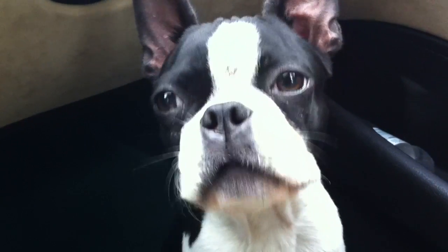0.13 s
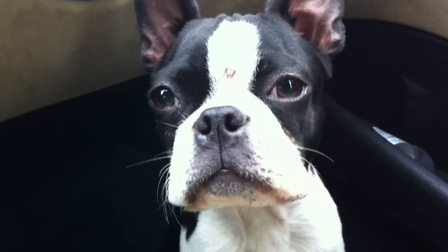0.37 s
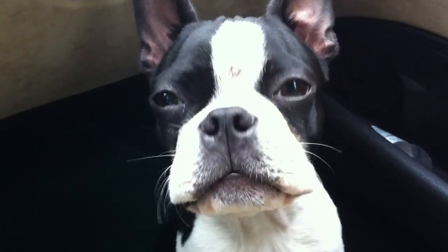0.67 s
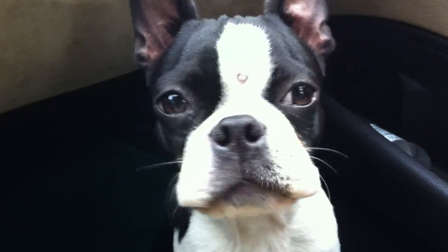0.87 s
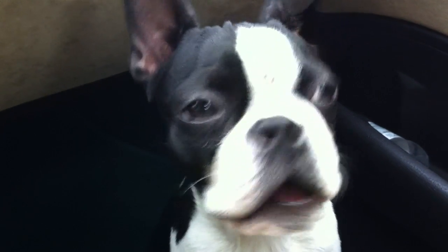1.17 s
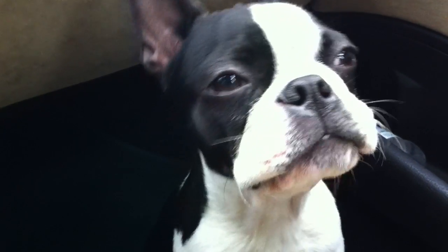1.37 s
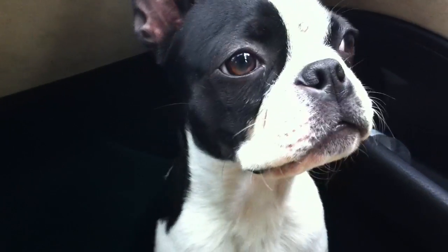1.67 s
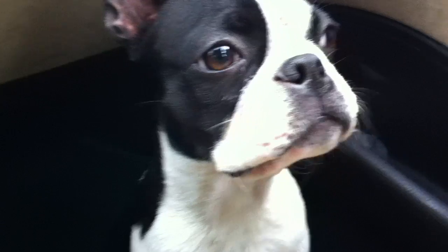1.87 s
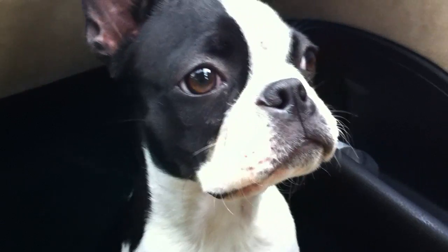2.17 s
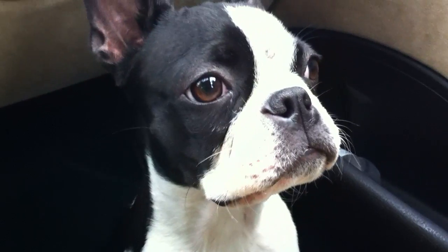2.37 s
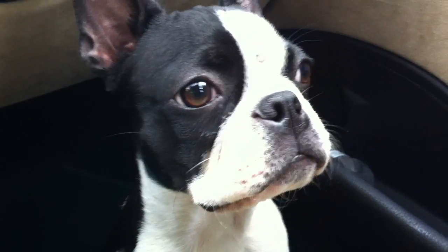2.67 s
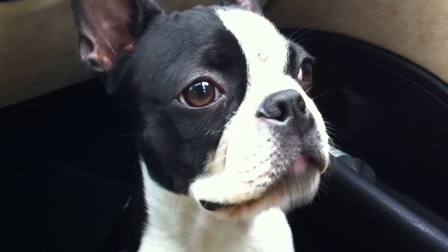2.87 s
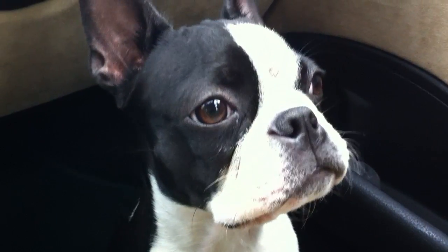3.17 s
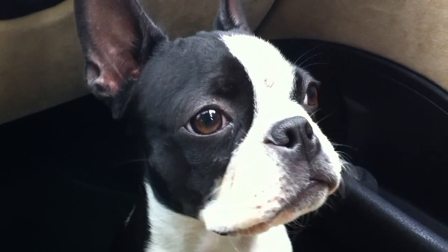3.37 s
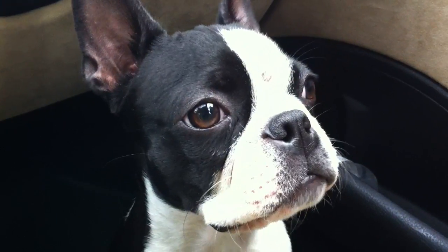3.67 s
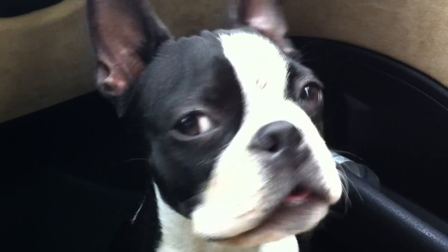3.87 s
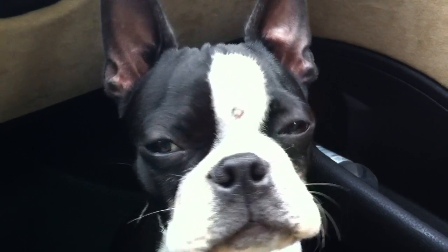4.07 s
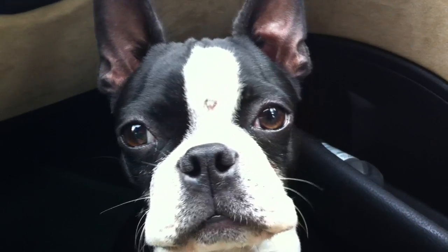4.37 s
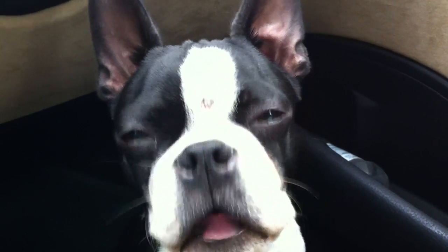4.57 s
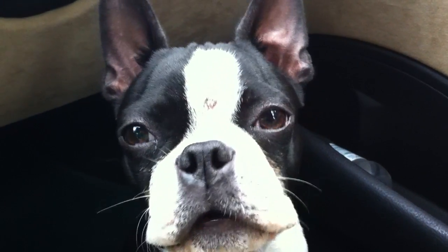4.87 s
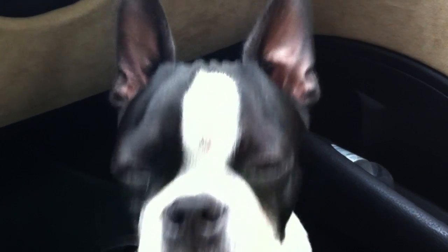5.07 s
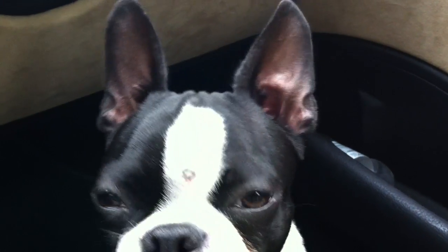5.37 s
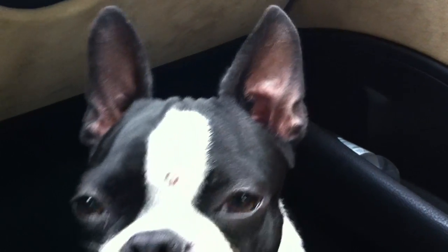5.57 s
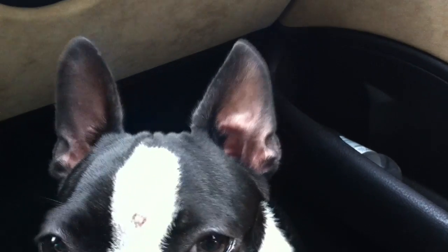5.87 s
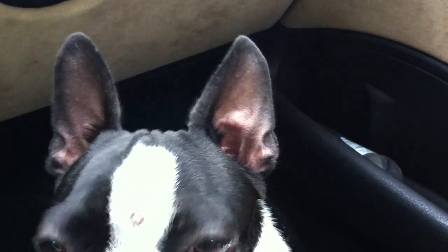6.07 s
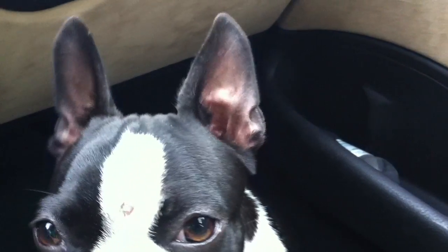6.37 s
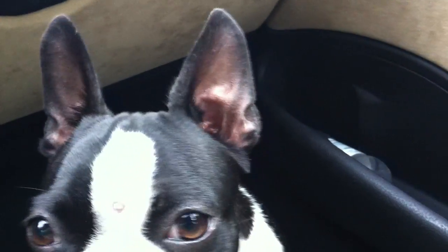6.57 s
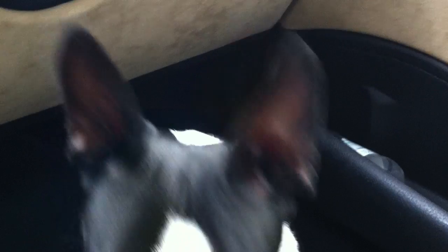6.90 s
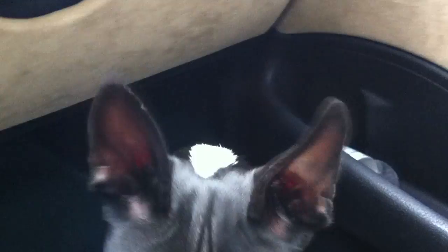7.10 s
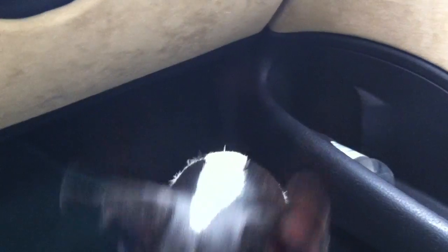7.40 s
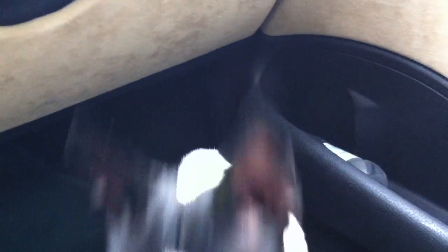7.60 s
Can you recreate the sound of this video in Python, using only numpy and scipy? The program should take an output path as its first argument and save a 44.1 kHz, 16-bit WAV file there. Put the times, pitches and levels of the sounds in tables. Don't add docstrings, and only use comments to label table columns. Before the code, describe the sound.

Close and dry in a padded car cabin: quick high squeaks of a squeeze toy run throughout at slightly uneven spacing, each wheezing as it refills. Between them a young dog whines, cracks upward, whimpers downward and yelps; after five seconds it gives three short yips among huffs, sniffs and mouth clicks. Some toy air puffs bump the microphone softly.

```python
import sys
import numpy as np
from scipy import signal
from scipy.fft import rfft, irfft
from scipy.io import wavfile
from scipy.ndimage import uniform_filter1d, minimum_filter1d

SR = 44100
rng = np.random.default_rng(int(sys.argv[2]) if len(sys.argv) > 2 else 0)


def voltage_ratio(decibels):
    exponent = np.asarray(decibels, float) / 20
    return 10 ** exponent


def unload_wav(signal):
    wavfile.write(
        sys.argv[1],
        SR,
        np.round(np.clip(np.atleast_2d(signal).T, -1, 1) * 32767).astype(np.int16),
    )


N = 341334

# start_s, length_s, top_pitch_hz, crest [share of length], level_db
SQUEEZES = [(-0.045, 0.068, 1714, .2, -13.5), (0.2456, 0.056, 1715, .11, -10.5),
            (0.4998, 0.06, 1719, .12, -11), (1.008, 0.067, 1720, .2, -10), (1.308, 0.055, 1714, 0.2, -12),
            (1.5741, 0.062, 1762, .13, -11.5), (1.862, 0.037, 1686, 0.1, -15.5),
            (2.161, 0.1, 1796, 0.4, -8.5), (2.472, 0.056, 1723, 0.2, -11), (2.7335, 0.081, 1751, .2, -10),
            (3.13, 0.042, 1706, 0.07, -14), (3.6166, 0.085, 1763, .3, -9.5),
            (3.8695, 0.064, 1717, .18, -12), (4.1727, 0.07, 1758, .28, -10.5),
            (4.4215, 0.071, 1785, .2, -7.5), (4.661, 0.062, 1759, 0.3, -9.5),
            (4.9816, 0.06, 1737, 0.2, -11.5), (5.5144, 0.073, 1764, .25, -9.5),
            (5.791, 0.08, 1762, .29, -10), (6.1254, 0.079, 1765, .23, -10.5),
            (6.428, 0.026, 1703, 0, -13.5), (6.793, 0.047, 1704, .13, -11), (7.2507, 0.12, 1767, .4, -9.5),
            (7.6782, 0.072, 1773, 0.2, -9)]


def band(x, lo_hz, hi_hz, order=2):
    sos = signal.butter(order, [lo_hz, hi_hz], "band", fs=SR, output="sos")
    y = signal.sosfilt(sos, x)
    return y / np.sqrt(np.mean(y ** 2))


def noise(lo_hz, hi_hz, order=2):
    return band(rng.standard_normal(N), lo_hz, hi_hz, order=order)


def colour(points, hz):
    f, db = np.transpose(points)
    return np.interp(np.log(hz), np.log(f), db)


def coloured_noise(points):
    hz = np.linspace(1, SR / 2, N // 2 + 1)
    spectrum = rfft(rng.standard_normal(N)) * voltage_ratio(colour(points, hz))
    return irfft(spectrum, N)


def waver(rate_hz):
    knots = rng.standard_normal(5000)
    return 1.3 * np.interp(np.arange(N) * rate_hz / SR, np.arange(len(knots)), knots)


def play(calls, fade_s):
    calls = sorted(calls, key=lambda call: call[0][0])
    s, *columns = np.vstack(calls).T
    gate = np.zeros(N)
    for call in calls:
        gate[int(call[0][0] * SR):int(call[-1][0] * SR)] = 1
    widened = -minimum_filter1d(-gate, size=801)
    gate = minimum_filter1d(widened, size=801)
    gate = uniform_filter1d(gate, max(int(fade_s * SR), 1))
    return gate, [np.interp(np.arange(N) / SR, s, c) for c in columns]


def cabin():
    # frequency_hz, density_db
    hush_colour = [(30, -17.5), (200, 1), (360, -6), (1400, -3), (2000, -13), (8700, -18), (15000, -14.5)]
    hush = coloured_noise(hush_colour)
    return voltage_ratio(-61.5 + 1.8 * waver(7)) * hush / hush.std()


def toy():
    # frequency_hz, level_db
    reed = [(1300, -5.5), (1770, 2.5), (3500, 0), (5300, 0.5), (7000, 0.5), (8800, 4), (10600, -1.5),
            (12300, -1), (14200, -5.5), (16000, -12)]
    hz = np.full(N, 1500.)
    gain, slack, snap = np.zeros((3, N))
    for s, length, top_hz, crest, db in SQUEEZES:
        t = np.arange(-.012 * SR, 1.14 * length * SR) / SR
        i = (t * SR + s * SR).astype(int)
        inside = (i >= 0) & (i < N)
        t, i = t[inside], i[inside]
        u = t / length
        sag_hz = (167.5 - 330 * length) * np.clip((u - crest) / (.85 - crest), 0, None) ** 2.9
        rise_hz = 110 * np.clip(crest - u, 0, 1) ** 1.3
        catch_hz = 110 * np.exp(-np.clip(t, -.003, 1) / 0.0017)
        hz[i] = top_hz - sag_hz - rise_hz - catch_hz
        snap[i] = np.clip(t / .002 + .5, 0, 1)
        onset = 1 / (1 + np.exp(-t / 0.0021))
        release = np.clip((1.13 - u) / 0.062, 0, 1)
        gain[i] = voltage_ratio(db - 15.7 * np.clip(u, 0, None) ** 9) * release * onset
        slack[i] = np.clip(u, 0, 1) ** 3.4
    hz = hz * (1 + (.0006 + .022 * slack) * waver(600))
    phase = 2 * np.pi * np.cumsum(hz) / SR
    on, tone = gain > 0, np.zeros(N)
    for k in range(1, 10):
        shut = snap[on] * voltage_ratio(-k * slack[on]) if k > 1 else 1
        overtone_db = colour(reed, k * hz[on]) + 1.3 * waver(130)[on]
        tone[on] += shut * voltage_ratio(overtone_db) * np.sin(k * phase[on])
    jet = snap * voltage_ratio(-46 + 37 * slack) * noise(4500, 15500)
    draught = noise(53, 600) + voltage_ratio(5.5) * noise(760, 960)
    draught *= voltage_ratio(-37.5 + 6.4 * waver(5.3))
    return gain * (voltage_ratio(-10) * tone + jet) + uniform_filter1d(gain * slack, 900) * draught


def cries():
    # time_s, pitch_hz, level_db, mouth_opening [0-1]
    whines = [
        [(0.625, 383, -60, 0.95), (0.64, 413.5, -35.5, 0.67), (0.67, 618, -29, 0.5), (0.71, 782, -14, .35),
         (0.74, 981, -32, 0.39), (0.78, 948, -32, 0.48), (0.8, 726, -30.5, 0.28), (0.85, 742, -30, 0.34),
         (1.0, 656, -43, 0.52)],
        [(1.875, 936, -35.5, 0.6), (1.89, 770, -30, 0.3), (1.92, 1062, -43.5, 0.72), (1.945, 901, -35, 0.25),
         (1.965, 733, -42.5, 0.5), (2.03, 806, -37, 0.19), (2.085, 739, -35, 0.2)],
        [(2.1, 648, -48.5, 0.36), (2.18, 505, -45, 0.7), (2.24, 417.6, -54, 0.2), (2.3, 417, -45, 0),
         (2.35, 380, -49, 0.55), (2.46, 345, -51.5, 0.75), (2.52, 374, -46, 0.42)],
        [(3.18, 925, -34, .1), (3.21, 772, -28.5, 0.46), (3.245, 761, -38.5, .1), (3.27, 736, -23.5, 0.13),
         (3.385, 728, -33.5, 0), (3.41, 530, -37.5, 0.16), (3.435, 483, -47.5, .05)],
    ]
    # time_s, pitch_hz, level_db, mouth_opening [0-1]
    yelps = [
        [(3.0, 494.4, -70, 0.8), (3.012, 543.1, -44.5, 1), (3.04, 754.2, -24.5, 0.81), (3.07, 1098, -11, 0.41),
         (3.085, 1144, -25, .6), (3.1, 1221, -32.5, .35), (3.13, 1202, -38.5, 0)],
        [(3.885, 530, -44.5, 0.8), (3.92, 734, -33.5, .9), (3.945, 807, -22.5, 0.77), (3.96, 961.5, -22, .55),
         (3.98, 857.4, -29, .65), (4.02, 734.6, -34, 0)],
        [(4.022, 766.3, -32.5, 0.35), (4.045, 813, -34, 0.25), (4.06, 922.3, -40.5, 0.07),
         (4.08, 755, -30, 0.33), (4.2, 707.3, -26.5, 0.4), (4.24, 744, -28.5, 0.4), (4.3, 598.4, -34.5, 0.5),
         (4.36, 417.4, -48, .55), (4.43, 286.6, -54.5, 0)],
        [(4.7, 780, -40.5, 0.2), (4.72, 885.3, -18, .5), (4.745, 1245, -24, 1.03), (4.765, 1501, -26, 0.7),
         (4.79, 1492, -61, 1)],
    ]
    # time_s, pitch_hz, level_db, mouth_opening [0-1]
    sobs = [
        [(1.312, 905, -60, 0.58), (1.32, 958, -20, 0.52), (1.345, 1146, -19, 0.71), (1.359, 1130, -24, 0.33),
         (1.362, 1512, -19, 0.9), (1.372, 1470, -25, 0.22), (1.39, 1489, -49, .6)],
        [(1.492, 964.3, -43.5, 0), (1.525, 914.8, -29, 0), (1.55, 658.8, -44.5, .5), (1.585, 567, -39.5, 0.36),
         (1.61, 473, -57, 0.37)],
        [(7.61, 623, -48, 0.52), (7.645, 635, -45.5, 0.85), (7.655, 856, -35.5, 0.74), (7.675, 810, -31, 0.12)],
    ]
    # start_s, first_pitch_hz, top_pitch_hz, level_db, mouth_opening [0-1]
    yips = [
        (5.147, 709, 1481, -9, 0.43),
        (5.92, 769, 1398, -15, 0.56),
        (6.27, 689, 1410, -14.5, 0.71),
    ]
    # share_of_length, share_of_climb, level_db, further_opening [0-1]
    yip_course = [
        (0, 0.11, -36, 0),
        (.13, .07, -6.5, 0.0089),
        (0.471, .37, -0.5, 0.014),
        (0.581, .85, -13.5, 0.34),
        (.8, 0.93, -17.5, .15),
        (0.999, 1, -49, 0.32),
    ]
    # start_s, length_s, first_pitch_hz, last_pitch_hz, level_db
    whimpers = [
        (0.019, 0.13, 573, 495, -57),
        (1.4, 0.049, 713, 835, -52),
        (1.453, 0.036, 1447, 1181, -37.5),
        (4.871, 0.036, 1264, 851, -38.5),
        (5.288, .025, 949, 1156, -35.5),
        (5.313, 0.032, 954, 1118, -33.5),
    ]
    # share_of_length, share_of_glide, level_db, mouth_opening [0-1]
    whimper_course = [
        (0, 0, -1, 0.5),
        (0.501, 0.41, 0.5, 0),
        (1, 0.85, -5, 0.2),
    ]
    yip_s = 0.08
    calls = whines + yelps + sobs
    for s, first_hz, top_hz, db, mouth in yips:
        calls = calls + [[(s + u * yip_s, first_hz + climb * (top_hz - first_hz), db + rel_db, mouth + more)
                          for u, climb, rel_db, more in yip_course]]
    for s, length, first_hz, last_hz, db in whimpers:
        calls = calls + [[(s + u * length, first_hz + glide * (last_hz - first_hz), db + rel_db, mouth)
                          for u, glide, rel_db, mouth in whimper_course]]
    return calls


def puppy():
    # frequency_hz, level_db
    throat = [(900, -9.5), (1900, -4.5), (2500, 11.5), (3100, 6), (3750, 9), (4300, 2.5), (4800, 1),
              (5500, -15.5), (7000, -21.5), (8500, -23.5), (11000, -29), (13000, -34)]
    gate, (hz, low_db, mouth) = play(cries(), 0.0014)
    high_db = low_db - 42.5 + 42.5 * mouth
    nose_db = 21 * np.clip(np.log2(670 / hz), 0, 1)
    octave_db = low_db - 17 + 18.5 * mouth + nose_db
    octave_db = octave_db + 0.34 * colour(throat, 2 * hz)
    effort = np.clip((high_db + 51.5) / 20, 0, 1)
    jitter = .011 * waver(35) + (.007 + .014 * effort) * waver(450)
    phase = 2 * np.pi * np.cumsum(uniform_filter1d(hz, 250) * (1 + jitter)) / SR
    voice = voltage_ratio(low_db + 2.4 * waver(45) + 2 * waver(140)) * np.sin(phase)
    voice += voltage_ratio(octave_db + 3 * waver(45)) * np.sin(2 * phase)
    on = gate > 0
    for k in range(3, 17):
        db = high_db - 2.2 * (k - 3) * (1 - effort) + (3.5 + effort) * waver(80)
        voice[on] += voltage_ratio(db[on] + colour(throat, k * hz[on])) * np.sin(k * phase[on])
    breath = band(coloured_noise(throat), 1000, 14000)
    rasp = voltage_ratio(high_db - 1) * (1 + 0.9 * np.sin(phase)) * breath
    return gate * (np.sqrt(2) * voice + rasp)


def air():
    # start_s, length_s, hiss_db
    refills = [(0.025, 0.097, -60.5), (0.331, 0.042, -62.5), (.599, 0.025, -63), (1.111, 0.051, -58),
               (1.386, 0.082, -65.5), (1.663, 0.084, -58), (1.927, 0.093, -70), (2.277, 0.073, -61.5),
               (2.542, 0.076, -62.5), (2.829, 0.11, -64.5), (3.077, 0.062, -51.5), (3.19, 0.059, -57),
               (3.294, 0.05, -65), (3.728, 0.074, -59), (3.965, 0.092, -64), (4.245, .12, -53.5),
               (4.515, 0.071, -58.5), (4.76, 0.13, -64.5), (5.082, 0.084, -55), (5.61, 0.088, -59),
               (5.909, .053, -50.5), (6.234, 0.053, -52.5), (6.495, 0.11, -63.5), (6.886, .15, -57.5),
               (7.429, 0.19, -59.5)]
    # start_s, length_s, huff_db
    pants = [(0.08, 0.17, -58.5), (4.883, 0.14, -54), (5.23, 0.13, -55.5), (5.346, 0.076, -51),
             (5.621, 0.16, -55), (5.765, 0.022, -49.5), (5.975, 0.082, -44), (6.106, 0.06, -43.5),
             (6.326, 0.17, -47), (6.49, 0.11, -56), (6.727, 0.084, -51.5), (6.89, 0.22, -61.5),
             (7.633, 0.049, -43)]
    leak_s = 0.038
    # start_s, length_s, hiss_db, huff_db
    puffs = [(s - leak_s, leak_s + 0.0035, -65, -53.5) for s, *_ in SQUEEZES[1:]]
    puffs += [(s, length, db, db - 1) for s, length, db in refills]
    puffs += [(s, length, db - 17, db) for s, length, db in pants]
    puffs += [(.64, .13, -48, -62)]
    hiss, huff = np.zeros(N), np.zeros(N)
    for s, length, hiss_db, huff_db in puffs:
        i = int(s * SR)
        swell = signal.windows.tukey(int(length * SR), .95)[:N - i]
        hiss[i:i + len(swell)] += voltage_ratio(hiss_db) * swell
        huff[i:i + len(swell)] += voltage_ratio(huff_db) * swell
    gate, (_, db, _) = play(cries(), 0.016)
    hiss += gate * voltage_ratio(-54.5 + 0.43 * db)
    huff += gate * voltage_ratio(-40 + 0.43 * 1.3 * db)
    hiss *= voltage_ratio(2.2 * waver(50))
    huff *= voltage_ratio(2.6 * waver(40))
    bright = noise(4500, 5100) + voltage_ratio(10.5) * noise(5200, 11000)
    dull = noise(990, 3800) + voltage_ratio(-20.0) * noise(56, 270)
    return hiss * bright + huff * dull


def smacks():
    # start_s, peak_db, ring_hz
    clicks = [
        (0.151, -37.5, 510),
        (0.376, -39.5, 950),
        (1.147, -32.5, 830),
        (5.093, -36.5, 1418),
        (5.371, -30.5, 735),
        (5.413, -39, 706),
        (6.003, -26, 770),
        (6.235, -41.5, 1043),
        (6.481, -39.5, 710),
    ]
    out, t = np.zeros(N), np.arange(1300) / SR
    for s, db, hz in clicks:
        grit = rng.standard_normal(len(t))
        mouth = signal.butter(1, [hz * 0.97, hz * 1.1], "band", fs=SR, output="sos")
        ring = signal.sosfilt(mouth, grit)
        ring = (ring / ring.std() + .3 * grit) * np.exp(-t / .009)
        out[int(s * SR):int(s * SR) + len(t)] += voltage_ratio(db - 7.0) * ring
    return out


def cabin_echo(near):
    t60_s, level_db = .06, -19
    t = np.arange(6000) / SR
    tail = rng.standard_normal(len(t)) * np.exp(-np.log(1000) * t / t60_s) * (t > .002)
    tail /= np.sqrt(np.sum(tail ** 2))
    return voltage_ratio(level_db) * signal.fftconvolve(near, tail)[:N]


def buffet():
    # peak_s, peak_db, fall_s
    gusts = [
        (2.224, -29, 0.081),
        (2.524, -29, 0.024),
        (2.798, -35.5, 0.045),
        (3.164, -16.5, 0.064),
        (3.346, -27, 0.046),
        (3.673, -18, 0.096),
        (4.243, -21, 0.064),
        (4.511, -41.5, 0.074),
        (5.868, -37, 0.012),
        (6.535, -43, 0.076),
    ]
    courses = [[(s - 0.03, db - 15), (s, db), (s + fall, db - 32.5)] for s, db, fall in gusts]
    gate, (db,) = play(courses, .01)
    struck = rng.random(N) < 260 / SR
    sign, size = np.sign(rng.standard_normal(N)), rng.exponential(size=N)
    kicks = struck * sign * voltage_ratio(3 * size)
    swings = band(kicks, 115, 400) + voltage_ratio(-19) * band(kicks, 400, 1100, order=3)
    swings += voltage_ratio(-8) * noise(90, 300)
    return gate * voltage_ratio(db + 1.5) * swings


def scene():
    near = toy() + puppy() + air() + smacks()
    mix = near + cabin_echo(near) + buffet() + cabin()
    return np.tile(mix, (2, 1))


def top_cut(x):
    return signal.sosfilt(signal.butter(12, 16500, fs=SR, output="sos"), x)


def record(dry):
    dry = signal.sosfilt(signal.butter(2, 90, "high", fs=SR, output="sos"), dry)
    dry = .9 * np.tanh(dry / .9)
    dry = signal.sosfilt(signal.ellip(8, .2, 60, 15900, fs=SR, output="sos"), dry)
    return top_cut(dry)


dry = scene()
out = record(dry)
unload_wav(out)
```